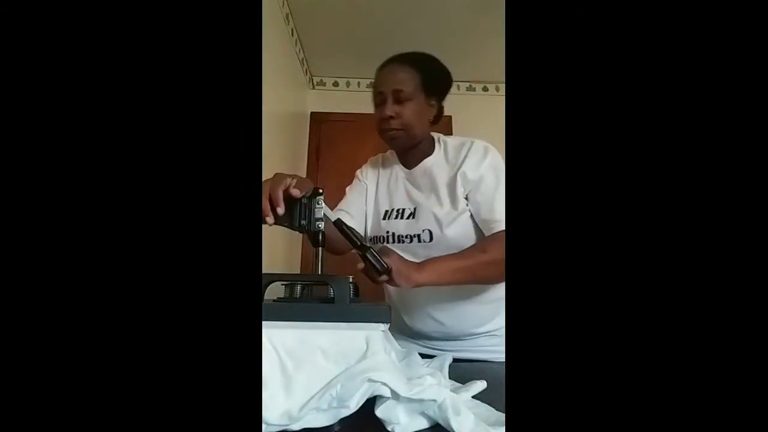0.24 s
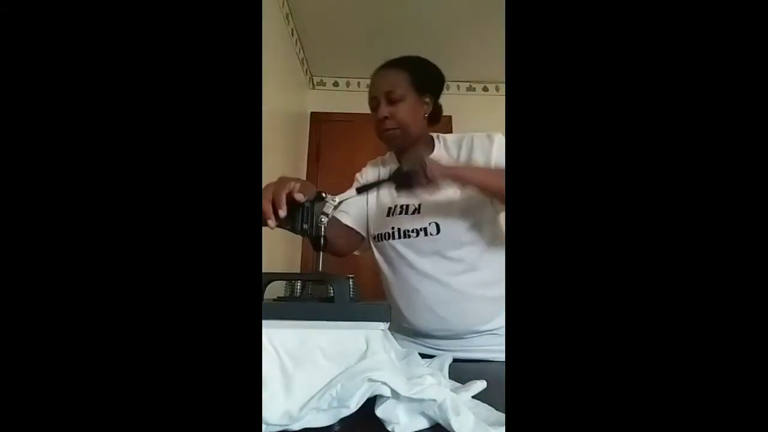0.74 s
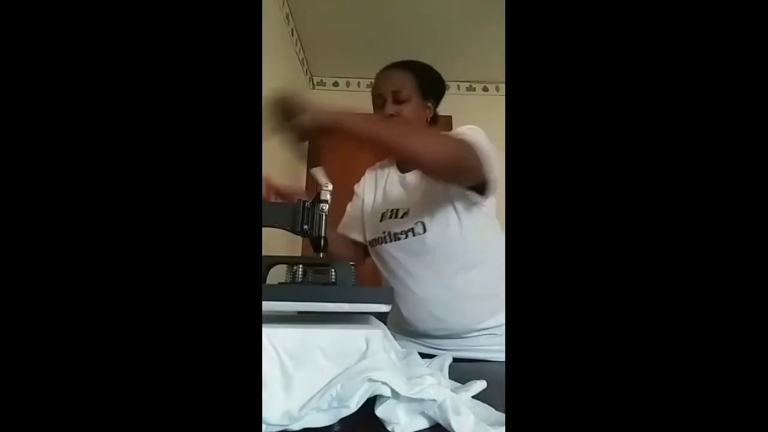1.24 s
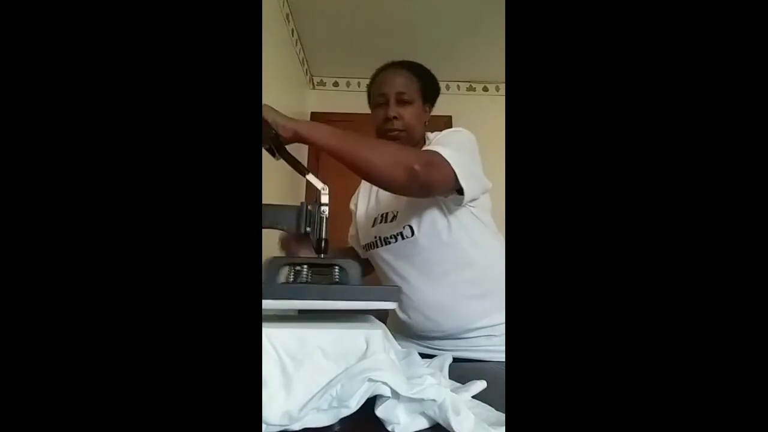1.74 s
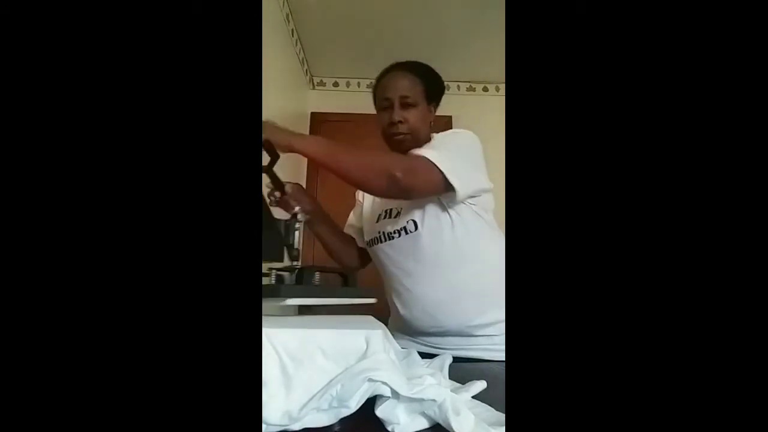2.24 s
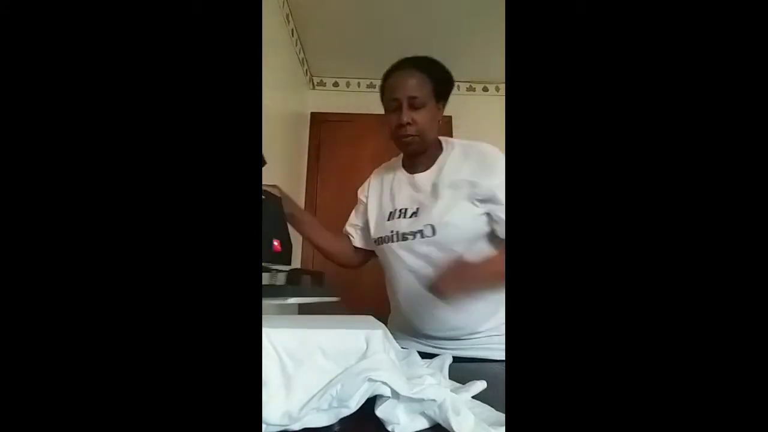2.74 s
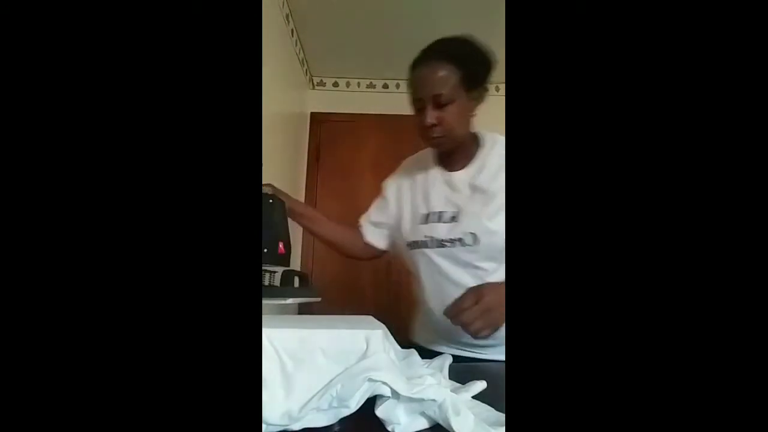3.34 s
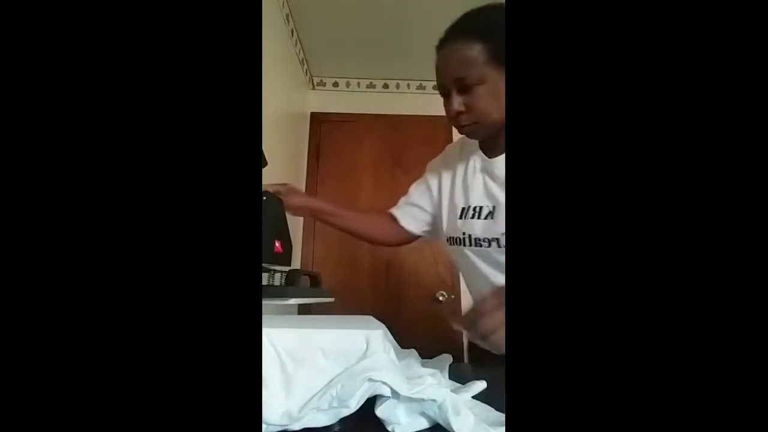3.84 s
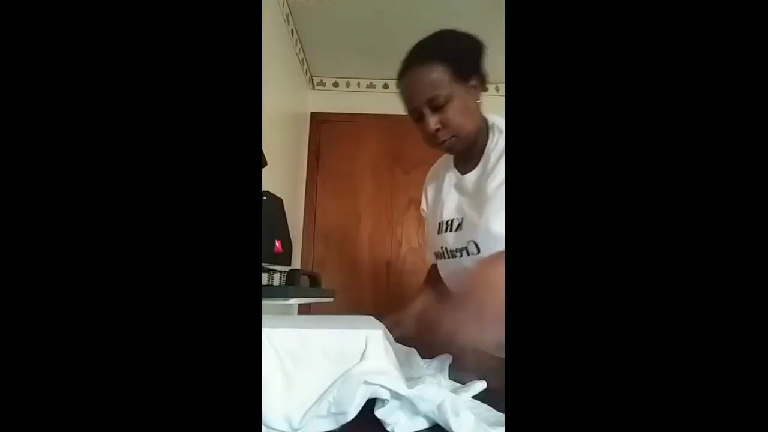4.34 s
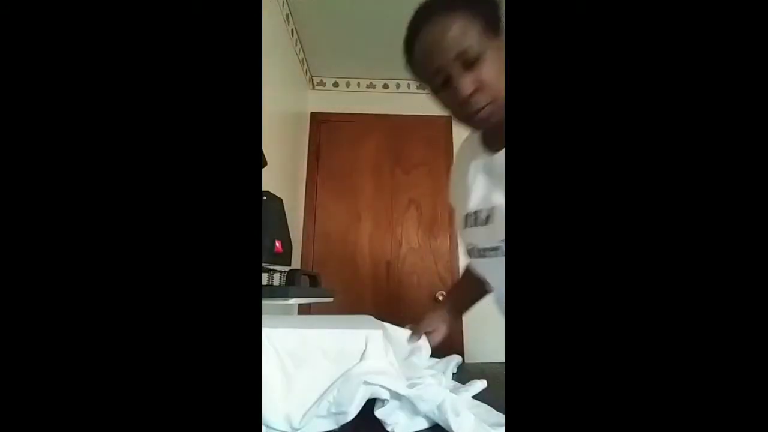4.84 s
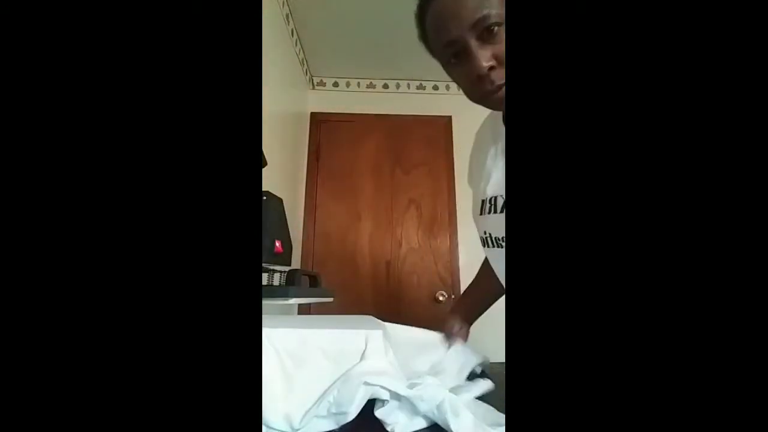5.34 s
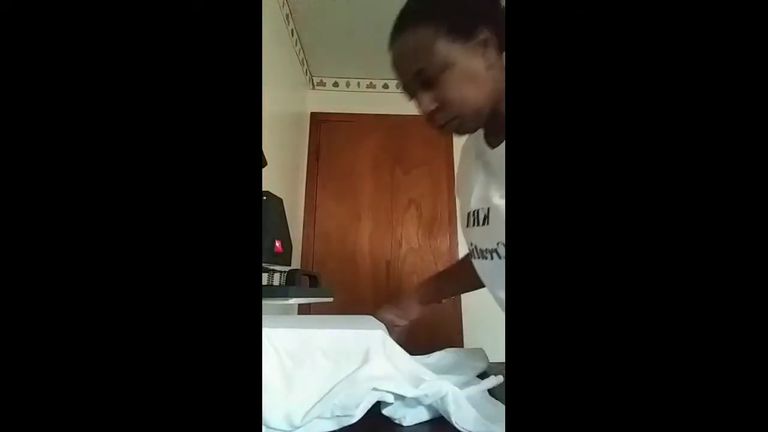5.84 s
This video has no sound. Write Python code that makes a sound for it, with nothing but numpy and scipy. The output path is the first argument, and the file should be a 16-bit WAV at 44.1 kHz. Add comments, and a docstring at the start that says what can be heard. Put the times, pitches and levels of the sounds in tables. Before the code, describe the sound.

In a small room, the latch of a heat press grinds and snaps with a thin ring, followed by a cluster of metallic clunks. Another thump comes as the press lifts, its arm creaks briefly, and dull thuds follow as it swings aside. A shirt rustles and flicks between hard knocks, ending in a loud, sharp clatter. A phone microphone picks it up over faint hum and hiss.

```python
"""In a small bare room, a heat press on a table is unlatched, lifted and swung aside; then a shirt is
pulled about on its plate. Each blow thumps the table, rings the steel frame and gives a bright tick.
The latch grinds and rings, the arm creaks once, cloth and joints rub, and the taut shirt flicks free.
Behind it all are mains hum and a faint hiss. A phone microphone picks up the sound."""
import sys
import numpy as np
from scipy import signal
from scipy.fft import rfft, irfft
from scipy.io import wavfile
from scipy.ndimage import uniform_filter1d

SR = 44100
rng = np.random.default_rng(int(sys.argv[2]) if len(sys.argv) > 2 else 0)


def to_wav(s):
    """Save 16-bit WAV."""
    ch = np.atleast_2d(s).T  # columns
    pcm = np.round(np.clip(ch, -1, 1) * 32767)  # PCM
    wavfile.write(sys.argv[1], SR, pcm.astype(np.int16))


N = 269010


def amp(db):
    """Turn decibels (dB) into a number to multiply by."""
    return 10 ** (np.asarray(db) / 20)


def rms_one(x):
    """Scale a sound so that its average level (rms) is 1."""
    return x / np.sqrt(np.mean(x ** 2) + 1e-20)


def at_hz(points, hz):
    """Read between the rows of a (Hz, value) table, with octaves evenly spaced."""
    return np.interp(np.log(hz + 1), np.log(np.array(points)[:, 0]), np.array(points)[:, 1])


def colour(x, spectrum):
    """Change the tone of white noise while keeping its overall level."""
    gain = amp(at_hz(spectrum, np.fft.rfftfreq(len(x), 1 / SR)))
    return irfft(rfft(x) * rms_one(gain), len(x))


def ring(x, hz, t60):
    """Each click in x starts a tone. Its ring time, t60, is the seconds it takes to fade by 60 dB."""
    r, w = amp(-60 / (max(t60, .005) * SR)), 2 * np.pi * hz / SR
    return signal.lfilter([0, np.sin(w)], [1, -2 * r * np.cos(w), r * r], x + 1e-18)


def resonance(x, hz, width_hz):
    """Let through a band of sound around one pitch."""
    r, w = np.exp(-np.pi * width_hz / SR), 2 * np.pi * hz / SR
    return signal.lfilter([(1 - r * r) / 2, 0, (r * r - 1) / 2], [1, -2 * r * np.cos(w), r * r], x)


def add(out, start, piece):
    """Mix a piece in, from a start time in seconds."""
    i = round(start * SR)
    out[i:i + len(piece)] += piece[:N - i]


def stroke(start, swell, fade, swell_db, fade_db, hold=0):
    """A loudness curve that climbs by swell_db to 1, holds, then sinks by fade_db; times in seconds."""
    times = start + np.cumsum([0, max(swell, .002), hold, max(fade, .002)])
    return amp(np.interp(np.arange(N) / SR, times, [-swell_db, 0, 0, -fade_db], left=-140, right=-140))


def background():
    """Room noise, wavering mains hum and narrow noise bands: a low drone, a mid band, a thin hiss."""
    # Each row: frequency in Hz, relative level in dB.
    air_tone = [(20, -43.5), (48, -2.5), (100, -4), (140, 0.5), (200, -14.5), (300, -6.5), (590, -14.5),
                (1050, -15.5), (1700, -16.5), (3100, -24.5), (5000, -29.5), (6800, -27), (8500, -34.5),
                (15000, -41)]
    # Each row: pitch in Hz, average level in dB.
    hum_tones = [(60, -73), (240, -72), (358, -80.5)]
    # Each row: pitch in Hz, width in Hz, average level in dB.
    noise_bands = [(250, 7.7, -77.5), (1644, 66, -73.5), (6540, 590, -77.5)]
    t = np.arange(N) / SR
    air = amp(-64.5) * colour(rng.standard_normal(N), air_tone)
    drift = uniform_filter1d(rng.standard_normal(N), size=2000)
    waver_db = 2.6 * rms_one(uniform_filter1d(drift, size=2000))
    hum = sum(amp(db) * np.sqrt(2) * np.sin(2 * np.pi * hz * t) for hz, db in hum_tones)
    bands = sum(amp(db) * rms_one(resonance(rng.standard_normal(N), hz, width))
                for hz, width, db in noise_bands)
    return air + hum * amp(waver_db) + bands


def room(x):
    """Echoes off the walls blur into a tail of noise; each octave dies away at its own rate."""
    # Each row: frequency in Hz, ring time in seconds, relative level in dB.
    echoes = [(60.3, 0.44, -10), (300, 0.26, 0), (1500, 0.23, -4), (5950, 0.32, -1.5), (13800, 0.42, 0)]
    t, tail, table = np.arange(SR // 2) / SR, 0, np.array(echoes)
    for low_hz in 30 * 2 ** np.arange(9):
        octave = signal.butter(2, [low_hz, 2 * low_hz], "band", fs=SR, output="sos")
        band = signal.sosfilt(octave, rng.standard_normal(len(t)))
        centre_hz = low_hz * np.sqrt(2)
        db, t60 = at_hz(table[:, ::2], centre_hz), at_hz(table, centre_hz)
        tail = tail + band * amp(db - 60 * t / t60)
    tail *= np.clip((t - .004) / 0.0024, 0, 1)   # wait for the first wall to answer
    tail *= amp(-40 * (t / 0.29) ** 2)   # the late tail fades faster
    return signal.fftconvolve(x, tail / np.sqrt(np.sum(tail ** 2)))[:N]


def rubs():
    """Cloth and joints rub in thousands of tiny clicks: coarse ones scrape, fine ones hiss."""
    # Each row: start, swell and fade in seconds, scrape level in dB, hiss level in dB.
    strokes = [(.49, 0.021, 0.12, -56.5, -81), (.55, 0.11, 0.025, -45.5, -56),
               (0.663, 0.0067, 0.16, -33, -54), (.69, .06, 0.19, -48, -45), (.8, 0.07, 0.049, -34.5, -63),
               (.87, 0.058, 0.21, -41, -55), (1.699, 0.017, 0.16, -63.5, -66.5),
               (2.599, 0.014, 0.069, -74, -49.5), (2.69, 0.038, 0.19, -61, -86.5),
               (2.745, 0.0033, 0.022, -73, -55), (3.1, 0.066, 0.1, -54.5, -54.5),
               (3.271, 0.014, 0.15, -53, -75), (3.59, .01, 0.15, -62.5, -54),
               (3.68, 0.047, 0.16, -69, -58.5), (4.04, 0.011, 0.084, -61.5, -62),
               (4.302, 0.067, 0.27, -60, -50.5), (4.545, 0.052, 0.12, -42.5, -57),
               (4.628, 0.11, 0.12, -37, -45), (4.83, 0.044, 0.16, -50, -54.5),
               (4.88, 0.1, 0.08, -68.5, -61), (5.22, 0.027, 0.12, -73, -59.5),
               (5.671, 0.077, 0.028, -50.5, -54), (5.74, 0.09, 0.12, -31, -56),
               (5.779, 0.059, 0.17, -38, -41)]
    # Each row of these two: frequency in Hz, relative level in dB.
    scrape_tone = [(88, -58), (150, 1.5), (346, -1), (478, 0), (570, -0.5), (1480, -4.5), (1640, 0.5),
                   (1960, -13), (2470, -17), (5000, -63.5), (6500, -49.5), (11000, -120)]
    hiss_tone = [(1180, -41), (2000, -11), (3170, -5), (4820, -13.5), (5300, -2.5), (6700, -0.5),
                 (8550, -21), (13800, -37.5), (16000, -55)]
    out, rows = np.zeros(N), np.array(strokes)
    shapes = np.array([stroke(*times, swell_db=18.5, fade_db=26) for times in rows[:, :3]])
    for levels_db, tone, grains_per_s, spread_db in ((rows[:, 3], scrape_tone, 3900, 2.74),
                                                     (rows[:, 4], hiss_tone, 8400, 0.78)):
        grains = (rng.random(N) < grains_per_s / SR) * rng.standard_normal(N)
        grains *= amp(spread_db * np.minimum(rng.exponential(1, N), 4))
        loudness = uniform_filter1d(amp(levels_db) @ shapes, size=1000)
        out += loudness * rms_one(colour(grains, tone))
    return out


def shirt_flick():
    """The taut shirt flicks free with a short, bright burst of noise."""
    # Each row: frequency in Hz, relative level in dB.
    flick_tone = [(1470, -67), (2800, -42), (3400, -18), (4480, -18), (4800, -9.5), (6200, -3.5),
                  (7770, -13.5), (9010, -24.5), (12600, -23), (16000, -31.5)]
    rise_s, hold_s, t60 = 0.0048, 0.0082, 0.018
    out, t = np.zeros(N), np.arange(SR // 5) / SR
    shape = np.clip(t / rise_s, 0, 1) ** 2 * amp(-60 * np.maximum(t - rise_s - hold_s, 0) / t60)
    burst = colour(rng.standard_normal(len(t)), flick_tone)
    add(out, start=4.872, piece=amp(-23.5) * burst * shape)
    return out


def arm_creak():
    """The dry pivot sticks and slips, unevenly and then faster, and each slip shakes the arm."""
    # Each row: pitch in Hz, width in Hz, relative level in dB, how steeply it follows the force.
    arm_bands = [(249, 114, 3.5, 0.83), (460, 51, -11, 2.1), (700, 27, -15.5, 0.99), (1166, 130, -13.5, 2),
                 (1600, 100, -19.5, 0.93), (2520, 190, -28.5, 1.8)]
    start_s, roughness = 2.576, .33
    slips_per_s = np.interp(np.arange(N) / SR, [start_s + .052, start_s + .06], [233, 265])
    wobble = roughness * rms_one(uniform_filter1d(rng.standard_normal(N), size=200))
    slip_count = np.floor(np.cumsum(slips_per_s * (1 + 0.075 * wobble)) / SR)
    slips = np.diff(slip_count, prepend=0)
    shake = slips * (1 + wobble) + 0.081 * roughness * rng.standard_normal(N)
    shape = stroke(start_s, swell=0.024, fade=0.055, swell_db=14.5, fade_db=28, hold=0.037)
    force = np.maximum(uniform_filter1d(shape, size=300), 0)
    out = np.zeros(N)
    for hz, width, db, power in arm_bands:
        band = resonance(resonance(shake, hz, width), hz, 2 * width)
        out += amp(db) * force ** power * rms_one(band)
    return amp(-33) * out


def cover_taps():
    """Soft taps ring a hollow cover, with no treble."""
    # Each row: start in seconds, strength in dB.
    taps = [(.8, -31), (.807, -27.5), (.814, -29.5)]
    # Each row: pitch in Hz, relative level in dB, ring time in seconds.
    cover_tones = [(774, -2.5, 0.052), (1105, 2, .04)]
    clicks = np.zeros(N)
    for start, db in taps:
        add(clicks, start, amp(db) * np.hanning(24) / 6)
    return sum(amp(db) * ring(clicks, hz, t60) for hz, db, t60 in cover_tones)


def latch():
    """The small lever grinds in its joint, slides with a thin hiss and rings high when it snaps."""
    # Each row: start in seconds, peak level in dB.
    strikes = [(0.64, -40), (0.651, -47), (0.668, -32), (.676, -22), (.712, -33.5)]
    # Each row: pitch in Hz, relative level in dB, ring time in seconds.
    lever_tones = [(1906, -2, 0.29), (2210, -1.5, 0.14), (2550, -7, 0.13), (2860, -11.5, .1),
                   (3225, 3, 0.2), (3430, -4, .06), (3820, -4, .15), (5400, -10, 0.1), (5920, 7, 0.11),
                   (6190, 3, 0.12), (6540, 6.5, 0.099), (7220, -3.5, .12), (7580, -4, .08)]
    # Each row: start, swell and fade in seconds, level in dB.
    slides = [(0.607, 0.035, 0.03, -44), (.665, 0.0096, 0.028, -46.5)]
    # Each row: pitch in Hz, width in Hz, relative level in dB.
    joint_bands = [(453, 180, -8.5), (843, 320, 1.5), (1140, 190, -1.5), (1460, 110, -1)]
    hiss_hz, hiss_width_hz = 11900, 2700
    out, t = np.zeros(N), np.arange(SR // 3) / SR
    hit, loose_buzz = amp(-60 * t / 0.0091), 0.15 * amp(-60 * t / 0.41)
    for start, peak_db in strikes:
        shake = rng.standard_normal(len(t)) * (hit + loose_buzz)
        lever = sum(amp(db) * ring(shake, hz, t60) for hz, db, t60 in lever_tones)
        add(out, start, amp(peak_db) * lever / np.abs(lever).max())
    hiss = resonance(rng.standard_normal(N), hiss_hz, hiss_width_hz)
    hiss = rms_one(resonance(hiss, hiss_hz, hiss_width_hz))
    slide = sum(amp(db) * stroke(*times, swell_db=10, fade_db=24) for *times, db in slides)
    grit = rng.standard_normal(N) * amp(2.98 * rng.exponential(1, N)) * (rng.random(N) < .1)
    grind = rms_one(sum(amp(db) * resonance(resonance(grit, hz, width), hz, width)
                        for hz, width, db in joint_bands))
    push = amp(-38.5) * stroke(start=0.55, swell=0.14, fade=.03, swell_db=14, fade_db=18)
    return out + uniform_filter1d(slide, size=300) * hiss + uniform_filter1d(push, size=800) * grind


def thump(hz, ring_share=1):
    """A soft push starts three low tones that sag and wander in pitch; the peak is 1."""
    sag, settle_s = 0.18, 0.028
    t = np.arange(SR // 3) / SR
    t60 = ring_share * 0.14 * (100 / hz) ** 0.47   # higher thumps die sooner
    wander = 0.13 * np.interp(t, np.arange(40) / 120, rng.standard_normal(40))
    phase = 2 * np.pi * hz * np.cumsum(1 + sag * (np.exp(-t / settle_s) - .5) + wander) / SR
    wave = sum(gain * np.sin(ratio * phase) * amp(-60 * t / (longer * t60))
               for ratio, gain, longer in ((0.982, 0.8, 1.11), (0.738, .3, 1.4), (1.7, 0.1, 1.2)))
    wave *= np.clip(t * hz * 2, 0, 1)   # fade in over half a cycle
    return wave / np.abs(wave).max()


def hand_knocks():
    """Hands and table knock dully; soft flesh cuts the ringing short."""
    # Each row: start in seconds, peak level in dB, pitch in Hz.
    knocks = [(0.694, -29, 82), (0.811, -27.5, 178), (1.19, -48, 59.6), (1.662, -50, 64.1),
              (1.722, -45.5, 85.5), (1.818, -52.5, 230), (1.879, -44.5, 96.7), (1.979, -45.5, 54.4),
              (2.02, -52, 380), (2.127, -39.5, 274.4), (2.552, -51, 70), (3.17, -31, 91), (3.211, -29, 95),
              (3.34, -45.5, 62), (3.429, -53, 302), (3.453, -42.5, 337), (3.491, -49, 298),
              (3.515, -49.5, 332), (4.069, -51, 68), (4.237, -53.5, 154), (4.31, -46, 93),
              (4.445, -27.5, 364), (4.65, -7.5, 356), (4.896, -43, 510), (5.149, -53, 75),
              (5.691, -36, 370), (5.698, -41, 353)]
    out = np.zeros(N)
    for start, db, hz in knocks:
        add(out, start, amp(db) * thump(hz, ring_share=0.43))
    return out


def press_blows():
    """Each blow thumps the table, cracks and ticks; the hit and rattling parts ring the steel frame."""
    # Each row: start in seconds, thump level in dB, thump pitch in Hz, base level in dB, plate level
    # in dB, struck spot (the pitch that rings best, in octaves above 1000 Hz), tick level in dB,
    # tick brightness in dB per octave, rattle ring time in seconds.
    blows = [(0.639, -68, 231, -56, -55, 0.48, -43, 4, 0.043),
             (.675, -51, 62, -24.5, -21, 0.31, -20, 4, 0.05),
             (0.72, -27, 70.4, -45, -48, 0.4, -41, -9, 0.06),
             (0.806, -25, 76.4, -39, -45, 0.069, -59.5, 8, 0.045),
             (.856, -21.5, 71.5, -20.5, -27, 0.28, -33, 3, 0.04),
             (.864, -15.5, 126, -24.5, -11.5, 0.29, -27, 0, 0.02),
             (.94, -36, 74.5, -54, -54, .3, -41.5, 6, 0.021),
             (0.964, -27.5, 92, -46, -48, 0.39, -51, 7, .02),
             (.988, -40, 58, -48, -30.5, 0.13, -41, 0, 0.017),
             (1.449, -16.5, 137, -26, -20.5, 0.22, -29.5, -1.5, 0.048),
             (1.457, -21, 76.5, -22.5, -33, 0.19, -62, 8, 0.081),
             (1.516, -33.5, 123, -36, -40, 0.13, -45, 0, 0.028),
             (1.764, -53, 217, -46, -48.5, 0.64, -57, -1, 0.035),
             (3.049, -56, 175, -46, -37.5, 0.49, -50, -3, 0.009),
             (3.078, -15.5, 125.8, -25.5, -32, -0.41, -50.5, -12, 0.072),
             (3.092, -19, 94.6, -28, -33, -0.12, -53, -8, 0.08),
             (3.119, -21, 81, -40, -50, -0.06, -48.5, 9, 0.068),
             (3.149, -22.5, 140.4, -34, -53, -0.089, -50, 31, 0.012),
             (3.282, -53, 177, -47.5, -51, 0.32, -70, 7, 0.081),
             (3.585, -60, 142, -50.5, -40, 0.48, -45, 11, 0.013),
             (4.443, -37.5, 199, -34.5, -34, 0.34, -25.5, -5, 0.013),
             (4.629, -53.5, 231, -27.5, -21, 0.44, -34, -9.5, 0.087),
             (4.649, -18, 153, -22.5, -24, 0.46, -18.5, -0.5, 0.02),
             (4.664, -20.5, 90.8, -32, -39, .3, -35.5, 13, 0.028),
             (4.702, -27, 94.5, -23, -20, .3, -49, 9, 0.03),
             (4.884, -49.5, 95, -37.5, -41.5, 1, -60, -5, 0.11),
             (5.225, -64, 71.5, -58, -60, .3, -61, -4, 0.16),
             (5.576, -48.5, 207, -26, -12, 0.35, -20, -2.5, 0.014),
             (5.582, -46, 151, -30, -20.5, 0.16, -27, -5, 0.046),
             (5.733, -40, 244, -18.5, -14, 0.88, -10, -2, 0.014),
             (5.7434, -24, 158, -15, -7, 0.0058, -17.5, -1.5, 0.027),
             (5.748, -29, 91, -31, -15, 0.65, -8.5, 2, 0.052),
             (5.778, -22, 118, -28, -12.5, 0.32, -7.5, -10.5, 0.027),
             (5.794, -49, 79, -19.5, -11, 0.83, -13.5, -17, 0.041),
             (5.815, -37, 92, -19, -9, 0.53, -11, -9.5, 0.022),
             (5.858, -33, 135.3, -24.5, -23.5, -0.05, -27, -6.5, 0.12)]
    # Each row: pitch in Hz, relative level in dB, ring time in seconds before damping.
    frame_tones = [(266, 4, 0.019), (295.6, 3, 0.036), (352.5, -1, 0.04), (391, -5, 0.081),
                   (486.3, -2, 0.078), (524, -3, 0.086), (596.7, -2, 0.043), (699.5, 1.5, 0.032),
                   (786, 0, 0.042), (838, -2.5, 0.092), (953, -1, 0.032), (1095.5, -0.5, 0.026),
                   (1202, -5, 0.065), (1318, -7.5, 0.05), (1420, 0.5, 0.018), (1596, -4.5, 0.078),
                   (1667, 1, 0.016), (1993, 4.5, 0.011), (2177, -8.5, 0.1), (2310, -2.5, 0.041),
                   (2840, -5.5, 0.026), (2870, -11, 0.011), (3290, 1, 0.021), (3330, -11.5, 0.027)]
    # Each row: frequency in Hz, relative level in dB.
    tick_tone = [(1470, -18), (2500, -9.5), (3800, -8), (4170, -13), (4910, -8.5), (6760, -10), (7470, -16),
                 (9810, -27.5), (13700, -38), (16000, -48)]
    longest_ring_s = .06   # padding and hands stop any long ring
    frame_hz = np.array(frame_tones)[:, 0]
    is_base = frame_hz < 650   # the heavy base rings low, plates and links ring high
    out, t = np.zeros(N), np.arange(SR // 3) / SR
    for start, thump_db, thump_hz, base_db, plate_db, spot, tick_db, tilt_db, rattle_s in blows:
        rattle_noise, tick_noise = rng.standard_normal((2, len(t)))
        strength = amp(rng.normal(0, 1.5, len(frame_tones)))
        detune = 1 + rng.normal(0, 0.02, len(frame_tones))   # hands and clamping shift the pitches
        add(out, start, amp(thump_db) * thump(thump_hz))

        # The rattle and tick fade in over about 3 ms, then die away.
        fade = amp(-60 * t / rattle_s) * np.clip(t / 0.0034, 0, 1)
        shake = 0.037 * rattle_noise ** 3 * fade   # a few big touches among many small ones
        shake[0] += 1   # the hit itself
        # Lighter parts thump higher and strike harder; a softer hit carries less treble.
        softer_octaves = 0.1346 * max(base_db - plate_db, 0) + 0.056 * tilt_db
        treble_hz = (1300 + 8.6 * thump_hz) * 2 ** -softer_octaves
        shake = signal.sosfilt(signal.butter(2, treble_hz, fs=SR, output="sos"), shake)

        rings = np.array([ring(shake, detune[k] * hz, min(t60, longest_ring_s)) * (-1) ** k * amp(db)
                          for k, (hz, db, t60) in enumerate(frame_tones)])
        off_spot_db = -9 * (np.log2(frame_hz / 1000) - spot) ** 2   # pitches far from the spot are weak
        base = strength[is_base] @ rings[is_base]
        plates = (strength * amp(off_spot_db))[~is_base] @ rings[~is_base]
        for part, peak_db in ((base, base_db), (plates, plate_db)):
            add(out, start, amp(peak_db) * part / np.abs(part).max())

        crack_filter = signal.butter(6, 1800 * 2 ** spot, fs=SR, output="sos")
        crack = np.diff(signal.sosfilt(crack_filter, signal.unit_impulse(200)))
        add(out, start, amp(plate_db - 2.5) * crack / crack.max())
        tilted_tone = [(hz, db + tilt_db * np.log2(hz)) for hz, db in tick_tone]
        add(out, start, amp(tick_db) * colour(tick_noise, tilted_tone) * fade)
    return out


def scene():
    """Mix the press and the shirt with their echo and the background."""
    press = press_blows() + hand_knocks() + cover_taps() + latch() + rubs()
    flick, creak = shirt_flick(), arm_creak()
    # The flick is close to the microphone, so it gets less echo.
    echo = room(amp(-5) * press + amp(-12) * flick + amp(-11) * creak)
    return (press + flick + creak + echo + background())[None]


def record(dry):
    """The microphone drops the deep bass, rounds off loud peaks and cuts the highest treble."""
    bass_hz, treble_hz, ceiling = 37.8, 16300, 0.84
    thinned = signal.sosfilt(signal.butter(2, bass_hz, "high", fs=SR, output="sos"), dry)
    rounded = ceiling * np.tanh(thinned / ceiling)
    return signal.sosfilt(signal.cheby2(16, 70, treble_hz, fs=SR, output="sos"), rounded)


dry = scene()
out = record(dry)
to_wav(out)
```